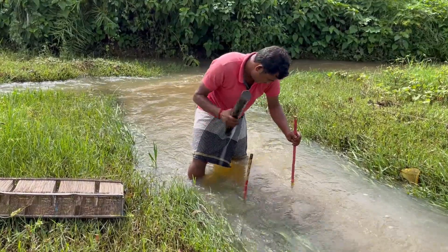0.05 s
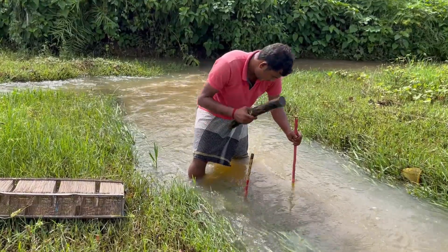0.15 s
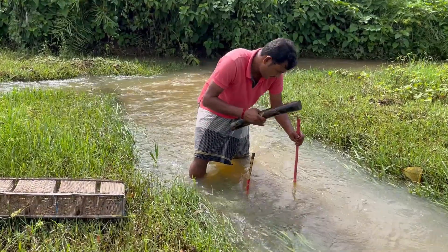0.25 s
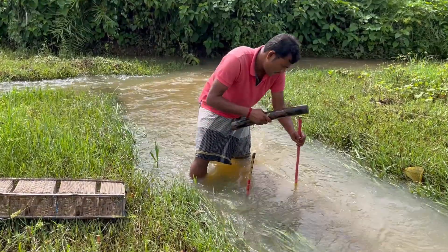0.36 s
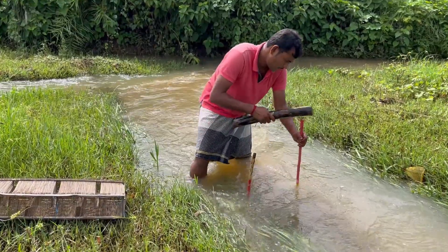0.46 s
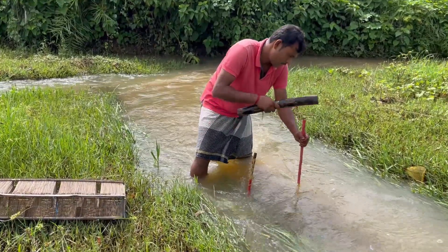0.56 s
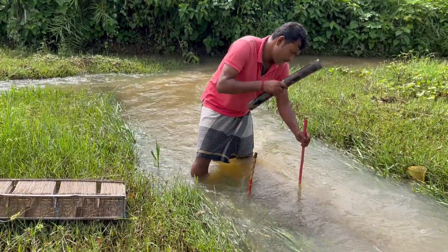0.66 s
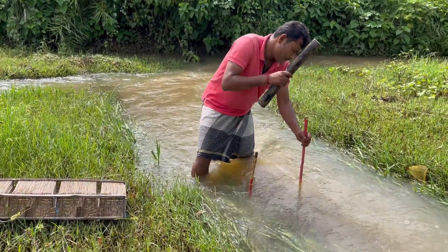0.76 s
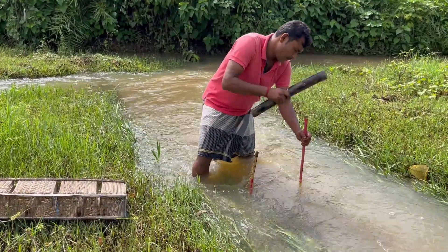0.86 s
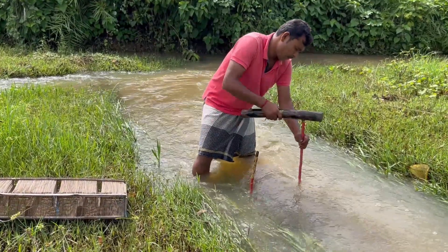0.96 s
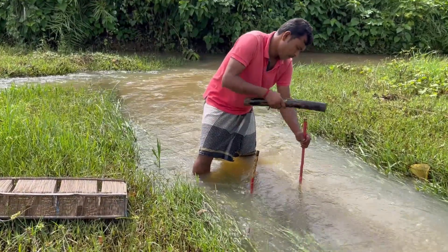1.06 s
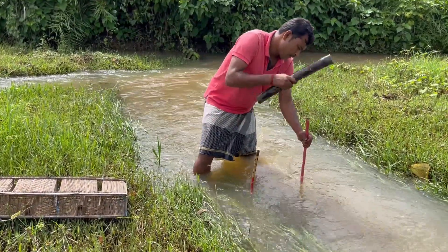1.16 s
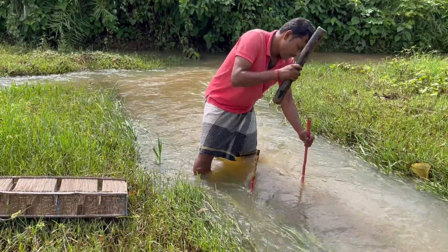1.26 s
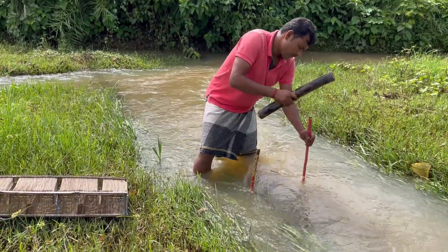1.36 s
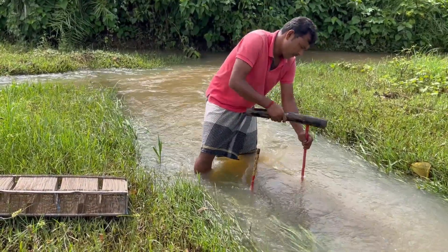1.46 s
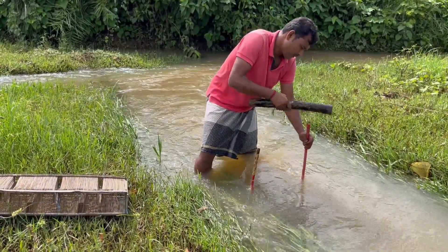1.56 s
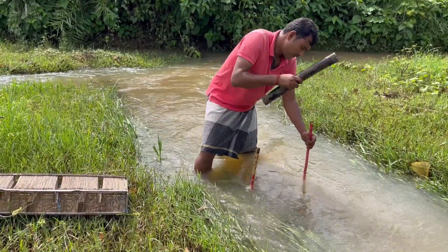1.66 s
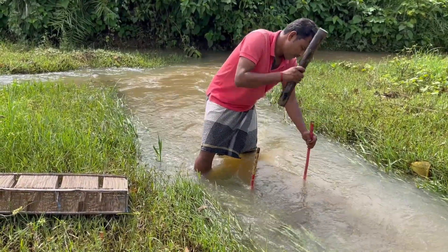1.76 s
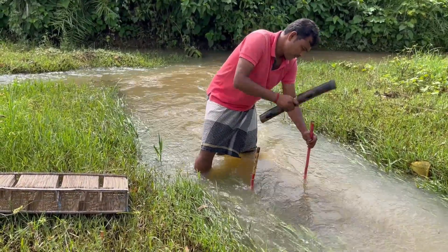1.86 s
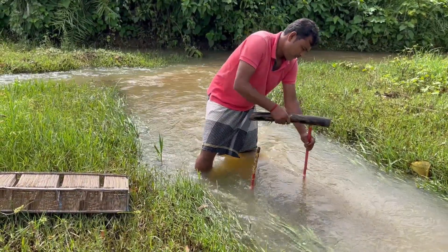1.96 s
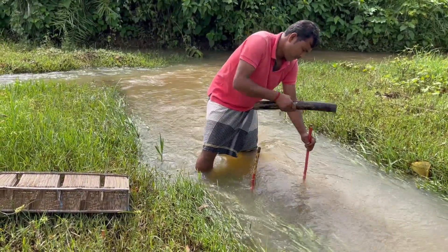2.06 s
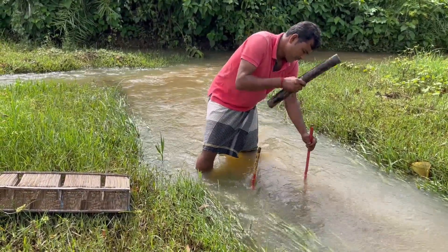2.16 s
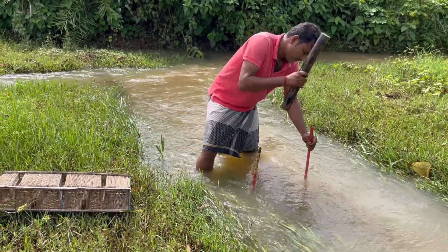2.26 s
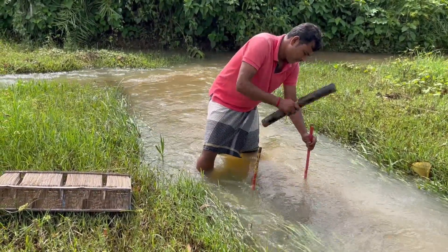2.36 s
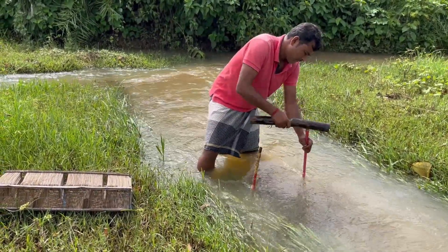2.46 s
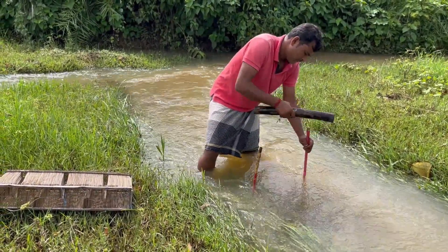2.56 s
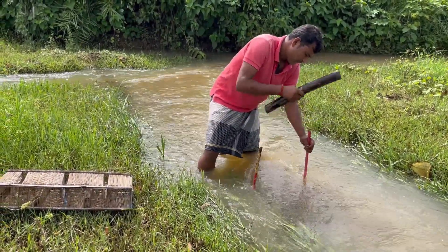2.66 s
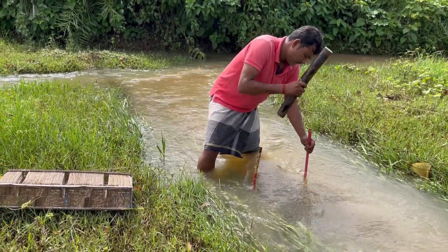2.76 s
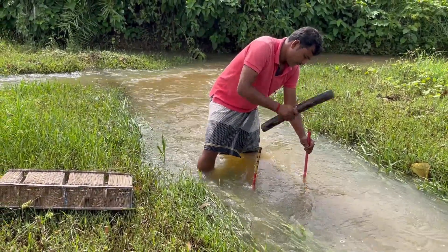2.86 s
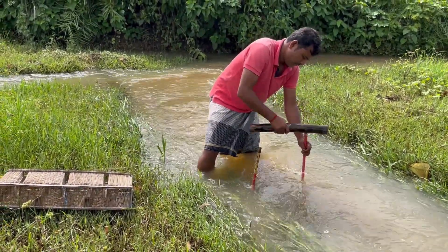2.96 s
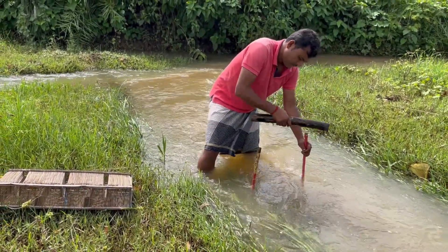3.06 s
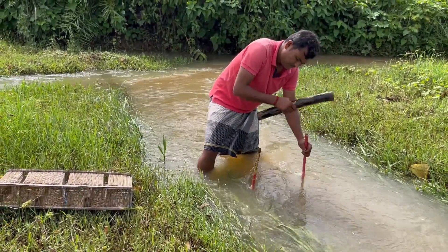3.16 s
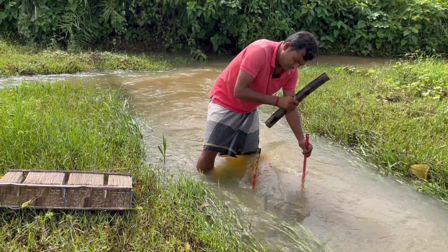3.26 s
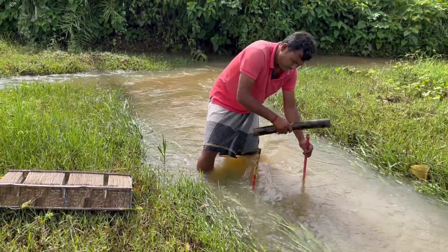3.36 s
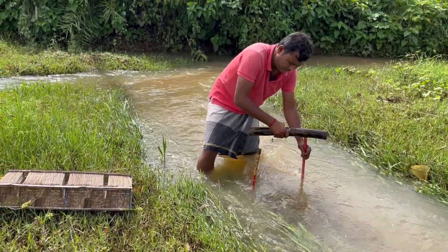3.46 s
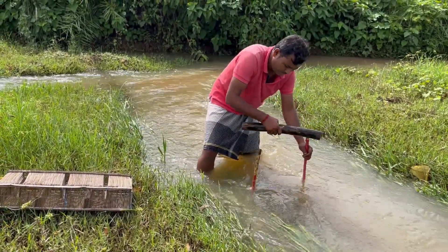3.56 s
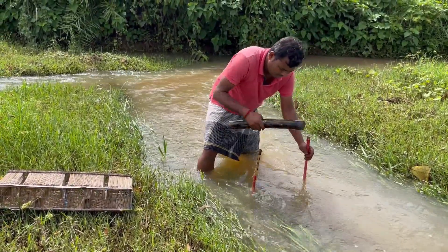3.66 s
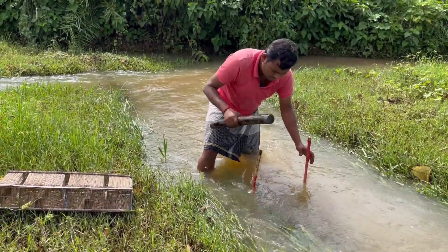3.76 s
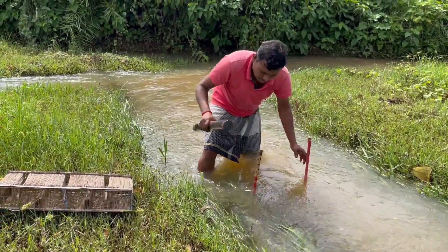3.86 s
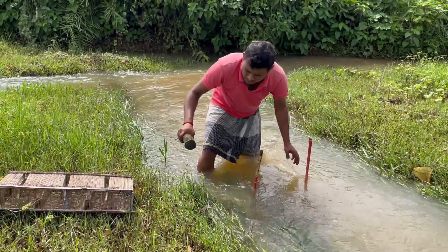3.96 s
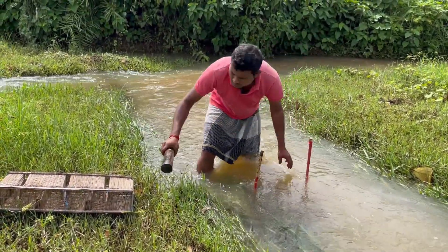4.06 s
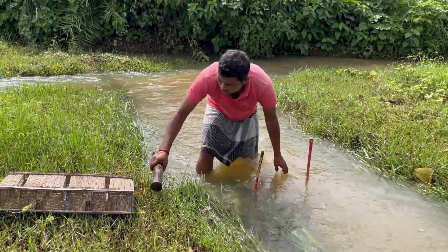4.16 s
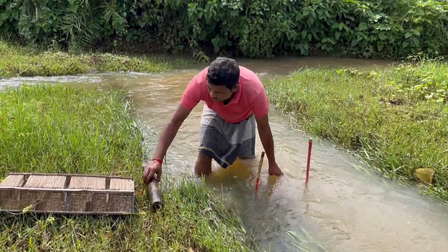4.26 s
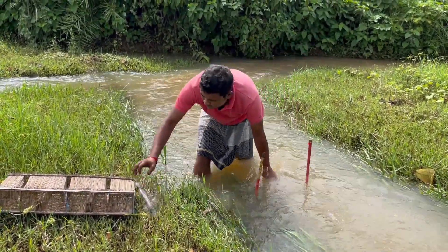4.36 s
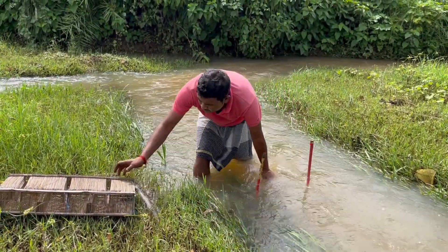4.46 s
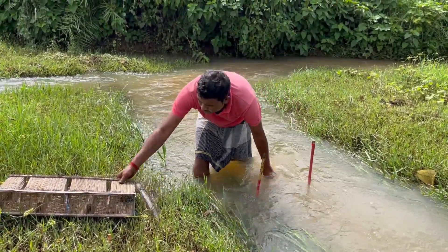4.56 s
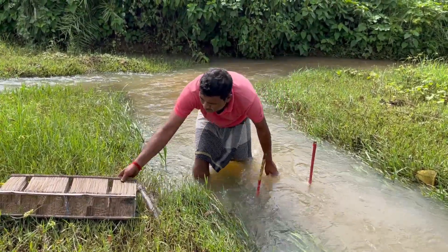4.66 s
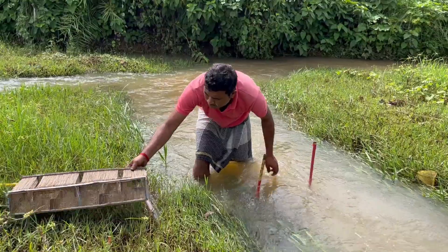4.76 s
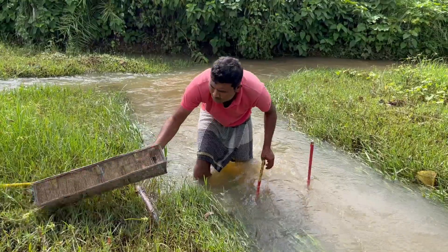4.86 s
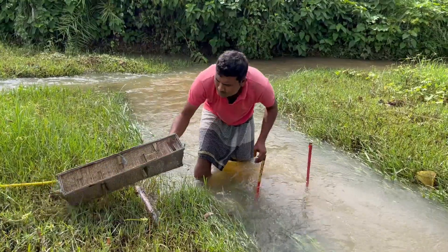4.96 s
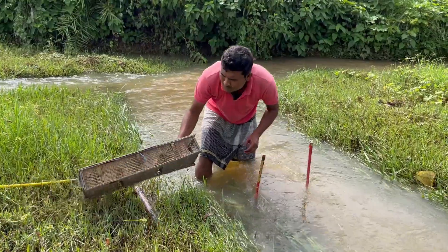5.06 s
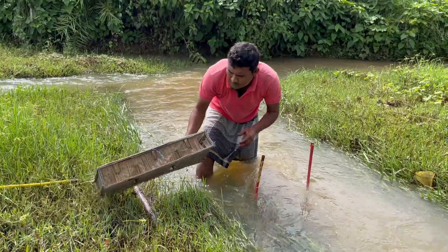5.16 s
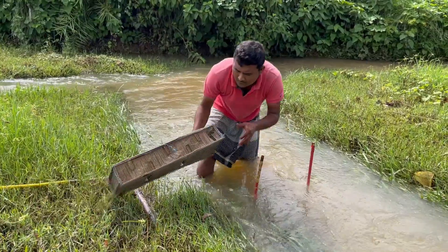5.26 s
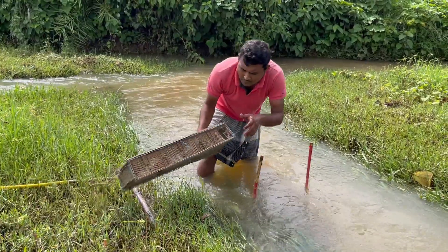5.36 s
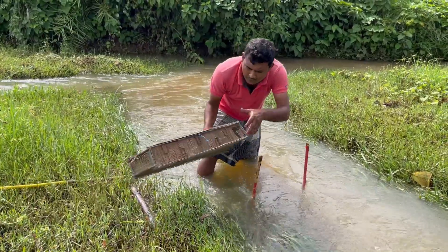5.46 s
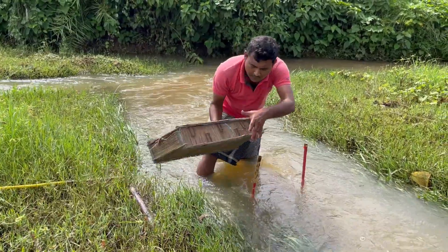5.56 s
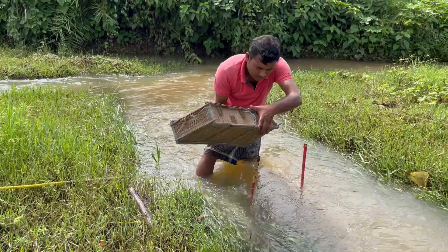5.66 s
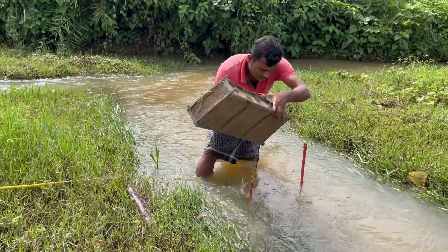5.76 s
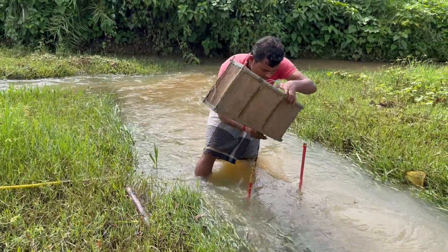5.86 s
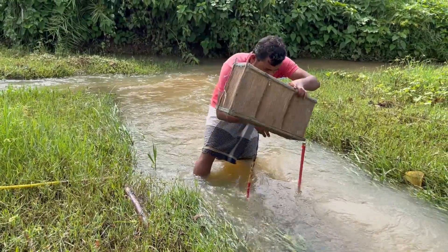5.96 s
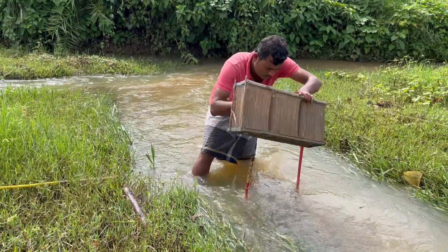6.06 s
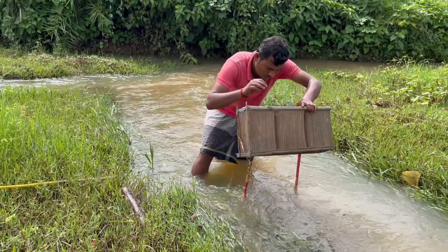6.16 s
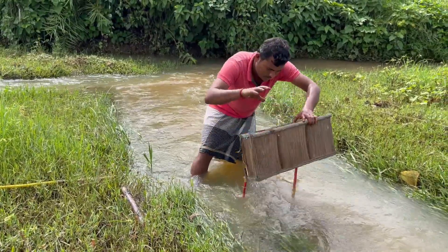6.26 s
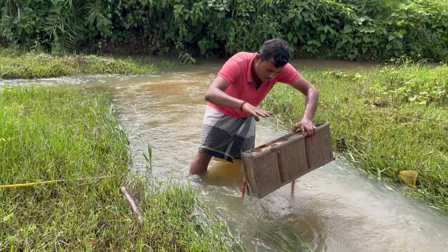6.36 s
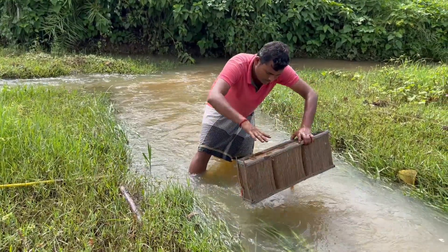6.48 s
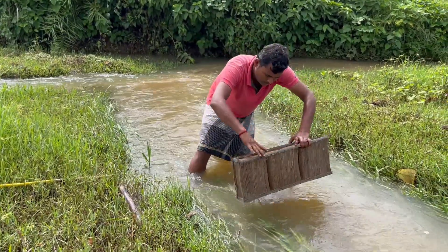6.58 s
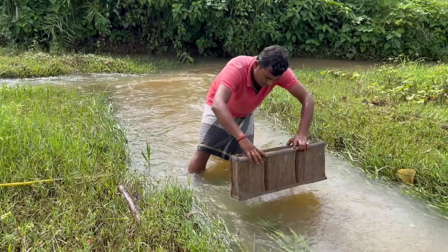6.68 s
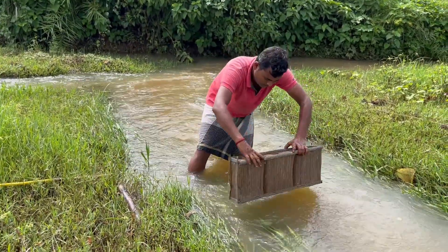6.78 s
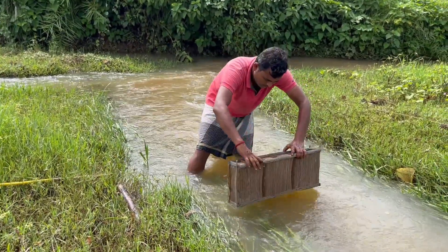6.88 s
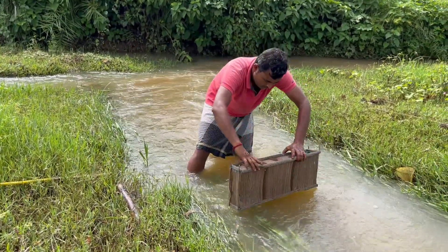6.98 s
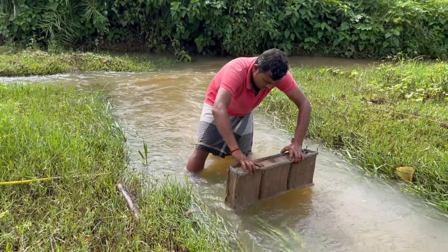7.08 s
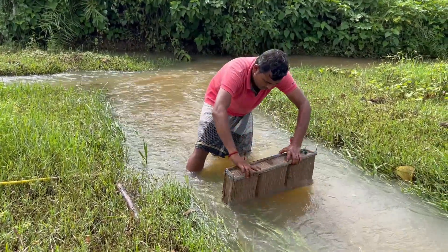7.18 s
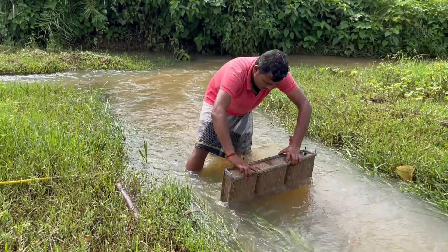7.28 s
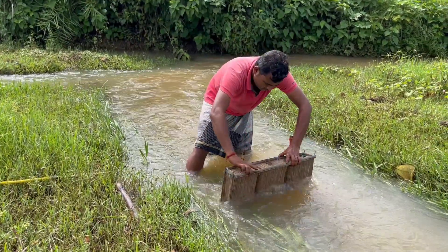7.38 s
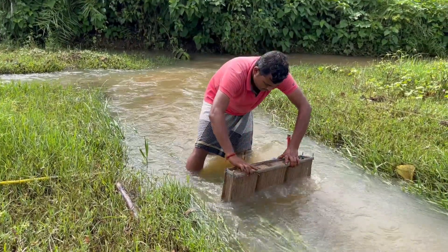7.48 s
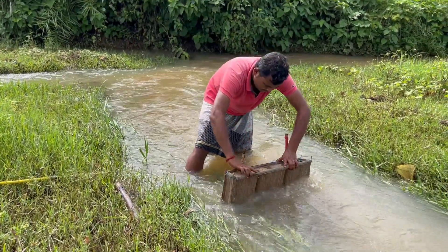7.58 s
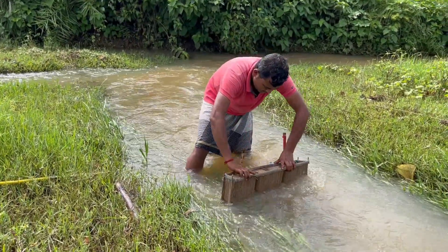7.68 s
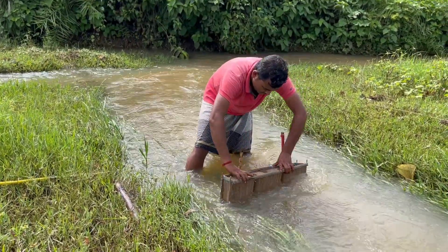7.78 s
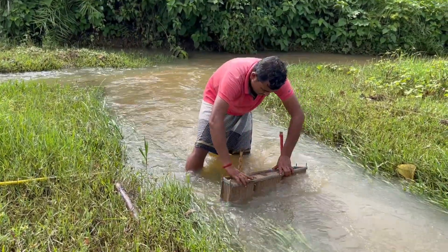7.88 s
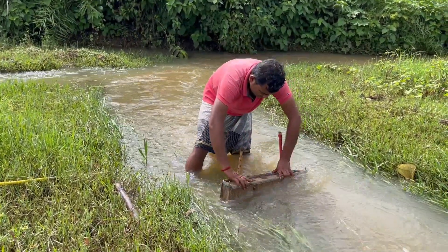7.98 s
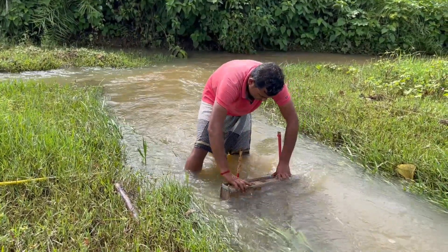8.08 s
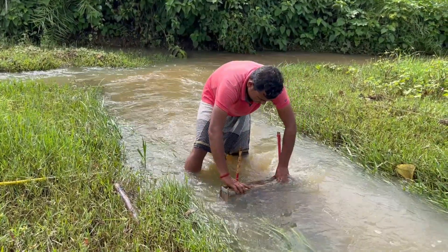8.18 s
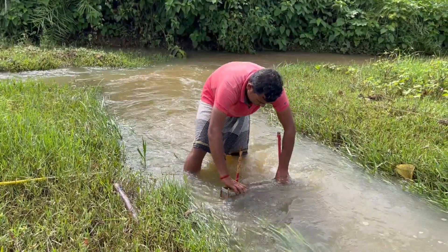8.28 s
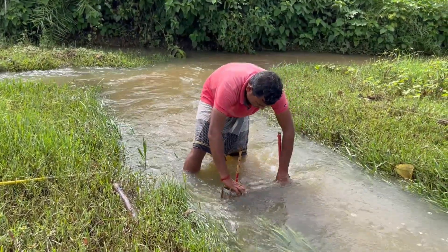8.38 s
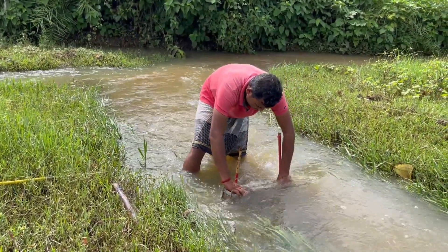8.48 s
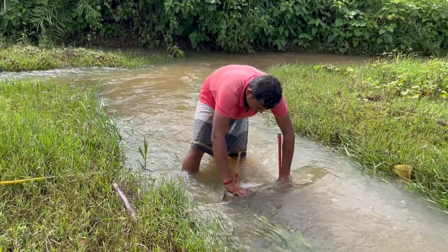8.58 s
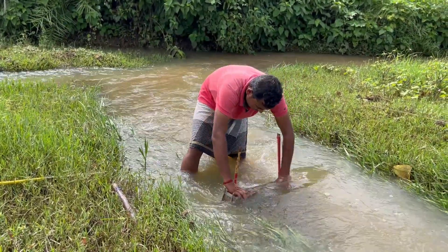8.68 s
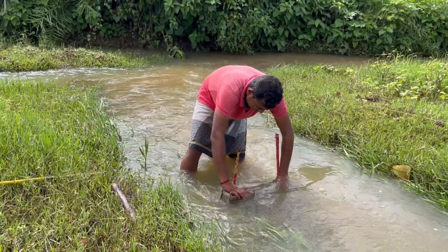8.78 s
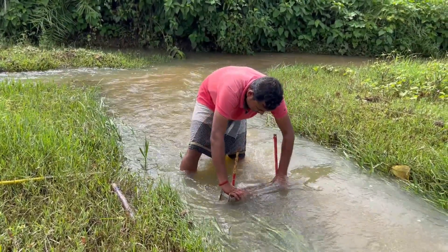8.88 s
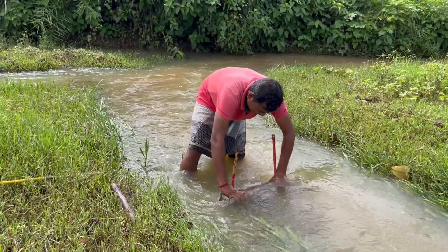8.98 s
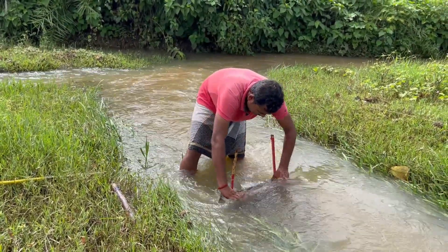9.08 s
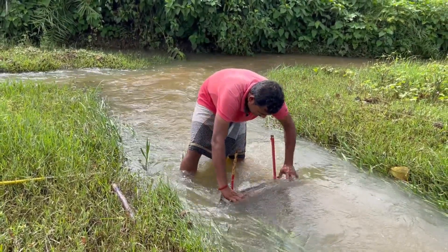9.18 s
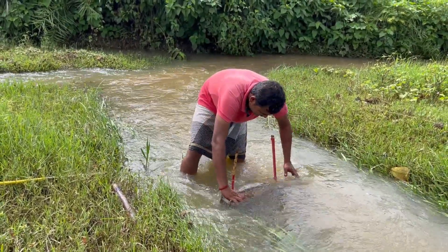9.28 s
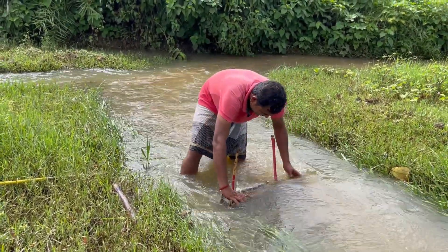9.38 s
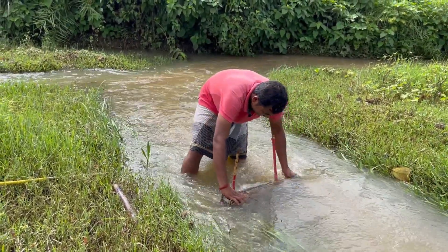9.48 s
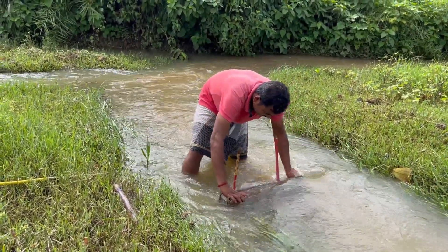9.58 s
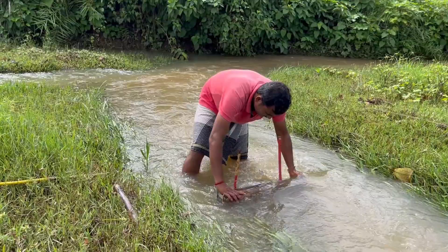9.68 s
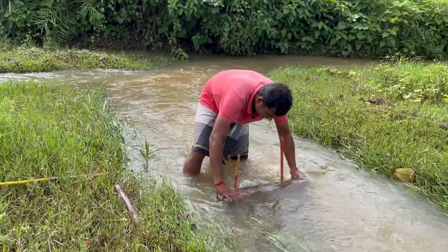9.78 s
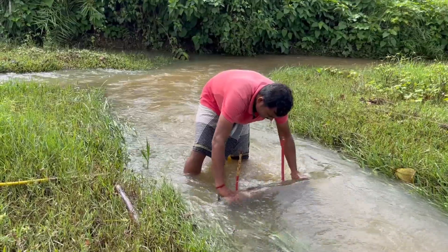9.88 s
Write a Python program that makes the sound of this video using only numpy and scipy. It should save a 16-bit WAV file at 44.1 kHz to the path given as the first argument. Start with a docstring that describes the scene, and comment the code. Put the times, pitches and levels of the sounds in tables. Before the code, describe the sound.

Six wooden knocks drive a stake in a gurgling shallow canal, a bar drops in grass, then a trap is pushed under with splashing.

```python
"""In a shallow canal with grassy banks, someone drives a wooden stake with a bar, drops the bar in the
grass, then drags a slatted trap over the grass and pushes it under the running water.
Blows and knocks are dying sine waves plus noise; water is many ringing bubbles, hiss and noise bursts.
A small bird trills in gliding sines. Wind buffets a handheld microphone as low noise and low thumps;
one more low thump is the bar landing. The two ports, left and right, colour the sound differently."""
import sys
import numpy as np
from scipy import signal
from scipy.fft import rfft, irfft, next_fast_len
from scipy.io import wavfile
from scipy.ndimage import uniform_filter1d

SR = 44100
rng = np.random.default_rng(int(sys.argv[2]) if len(sys.argv) > 2 else 0)


def to_wav(s):
    """Save 16-bit WAV."""
    ch = np.atleast_2d(s).T  # columns
    pcm = np.round(np.clip(ch, -1, 1) * 32767)  # PCM
    wavfile.write(sys.argv[1], SR, pcm.astype(np.int16))


N = 437913  # length in samples

# Wind rumble over time: (time [s], level [dB])
WIND_LEVEL = [(0.0, -54.5), (1.2, -55), (1.8, -53.5), (2.6, -56), (3.3, -54), (3.75, -58), (4.06, -55.5),
              (4.45, -57), (4.65, -49), (4.89, -45.5), (4.97, -48), (5.1, -45.5), (5.27, -43.5),
              (5.42, -62), (5.86, -53.5), (6.0, -57), (6.47, -57), (6.6, -64.5), (7.53, -64), (7.65, -53),
              (8.03, -48.5), (8.15, -58), (9.93, -57)]
# Tone of wind rumble and ground shudder: (frequency [Hz], level per Hz [dB])
RUMBLE_TONE = [(20, -25), (35, -7), (50, 0), (65, 4), (85, -1.5), (110, -3.5), (150, -8), (220, -35)]
# Low thumps: wind puffs on the ports, and at 4.371 s the thud of the bar landing:
# (time of the middle [s], peak level [dB], pitch [Hz], half length [s])
LOW_THUMPS = [(2.401, -38.5, 62, 0.041), (4.371, -38.5, 65, 0.026), (4.566, -41, 60.4, 0.035),
              (4.801, -33, 67.4, 0.043), (4.877, -25, 67, 0.041), (4.916, -34, 66, 0.027),
              (5.074, -31, 65.6, 0.026), (5.859, -37, 92.5, 0.013), (6.468, -57, 60, 0.041),
              (8.038, -26.5, 56, 0.042)]
LUMP_S, LUMP_DB = 0.13, 3  # length and strength of the lumps in the wind

# Notes of the bird: (start time [s], level [dB])
TRILL = [(5.305, -59), (5.395, -52), (5.488, -56), (5.583, -55), (5.68, -57), (5.778, -60), (5.88, -67)]
# Course of one note: (time after its start [s], pitch [Hz], level [dB])
NOTE = [(0, 7200, -22), (.006, 7000, -6), (.016, 6600, -9), (.03, 5300, -12), (0.037, 5050, 5),
        (.052, 5000, -6), (0.061, 5050, -10), (.085, 5000, -14)]

# Running and stirred water, 6 dB is added later: (time [s], gurgle level [dB], splash level [dB])
WATER_LEVEL = [(0.0, -56, -59), (1.38, -55.5, -61.5), (3.15, -54.5, -58.5), (3.6, -56, -61),
               (3.98, -53, -56.5), (4.4, -55, -54.5), (4.92, -57, -59), (5.55, -59, -62), (6.0, -57.5, -58),
               (6.41, -56.5, -61), (7.05, -61, -58.5), (7.3, -53, -54), (7.39, -49.5, -50.5),
               (7.5, -55, -53), (7.77, -55.5, -49.5), (8.16, -54.5, -53.5), (8.35, -51, -54),
               (8.63, -55, -52.5), (8.85, -57.5, -56.5), (9.2, -53.5, -51.5), (9.79, -52, -50),
               (9.93, -52, -51)]
# Tone of the low, middle and high water sounds: (frequency [Hz], level per Hz [dB])
GURGLE_TONE = [(70, -2), (120, -3.5), (250, -5), (450, -6.5), (700, -2.5), (1000, -11.5), (1400, -13.5),
               (2000, -13)]
SPLASH_TONE = [(800, -0.5), (1400, -2.5), (1900, -4.5), (2600, -6.5), (3600, -7.5), (5000, -10.5),
               (7000, -12), (9500, -23.5)]
SPRAY_TONE = [(4000, -42), (6000, -21), (7500, -12.5), (9500, -1), (12500, -6.5), (14500, -5), (16000, -45)]
# How alike the water is left and right: (frequency [Hz], likeness [0-1])
LIKENESS = [(100, 0.88), (250, 0.86), (470, 0.35), (900, 0.44), (1250, 0.27), (1600, 1), (2250, 0.074),
            (2800, 0.64), (5400, 0.53), (7300, 0.51), (8300, 1), (9600, 1), (12000, 1), (13800, 0.86)]
# Spray level on calm water (6 dB is added later), dB gained per dB of splash above calm, calm splash level
SPRAY_DB, SPRAY_FOLLOW, CALM_DB = -68.5, 0.78, -60.5
# The trap is pulled over the grass and the treble hiss swells: middle, width and height
DRAG_S, DRAG_WIDTH_S, DRAG_DB = 4.9, .2, 8.5

# Bubbles and drips at set times, 0.5 dB is taken off later: (time [s], level [dB], pitch [Hz], length [s])
BUBBLES = [(0.421, -27.5, 540, 0.0035), (1, -43.5, 4100, 0.0035), (1.59, -41, 4220, .0072),
           (2.024, -40.5, 646, 0.033), (2.699, -33, 687, 0.0093), (3.042, -35, 3630, 0.004),
           (3.647, -37.5, 834, 0.0065), (3.984, -41, 1340, 0.0058), (3.934, -42, 780, 0.0099),
           (4.074, -42, 730, .0097), (4.184, -40.5, 4000, 0.0046), (4.228, -39.5, 1720, 0.021),
           (4.26, -39.5, 786, 0.011), (4.537, -39, 1340, 0.0085), (4.567, -42, 4090, 0.0047),
           (4.837, -46, 1190, 0.014), (5.803, -39, 1530, 0.0052), (5.846, -35, 3110, 0.0025),
           (5.945, -38.5, 647, .0052), (6.087, -36, 2040, 0.0072), (6.185, -43, 554, 0.017),
           (6.862, -43, 1190, 0.015), (6.864, -41, 1430, .007), (6.881, -42, 1400, 0.0097),
           (7.156, -39, 1023, 0.021), (7.208, -38, 1830, 0.0073), (7.411, -36, 1370, 0.0065),
           (7.359, -39, 1000, .01), (7.81, -43, 5240, 0.013), (8.235, -39, 5820, .0057),
           (8.342, -38.5, 1510, 0.0039), (8.387, -36, 786, 0.0049), (8.409, -36, 219, 0.013),
           (8.455, -32, 930, 0.0034), (8.687, -38, 2770, .006), (8.707, -36, 2100, 0.0061),
           (8.725, -36.5, 1710, 0.012), (8.793, -40, 1030, .0079), (8.858, -41, 1500, 0.0048),
           (9.136, -36.5, 1340, 0.0082), (9.151, -35, 4950, .0067), (9.19, -38, 1200, .0098),
           (9.254, -41, 315, 0.018), (9.269, -41, 5730, .0061), (9.499, -41, 623, 0.018),
           (9.609, -34.5, 2360, 0.0045), (9.626, -40, 533, .028), (9.652, -37.5, 3320, .006),
           (9.407, -38.5, 746, .012), (9.736, -37, 1120, .0045), (9.752, -34, 2230, 0.004),
           (9.791, -38, 2950, 0.0064), (9.881, -39, 1980, 0.0085), (2.012, -45, 1860, 0.0084),
           (8.253, -44, 614, 0.016), (7.294, -42, 1320, 0.013), (7.639, -41, 1840, 0.012),
           (7.84, -49, 1840, 0.017), (8.545, -49, 444, .02), (9.443, -43, 2380, .01),
           (9.61, -34.5, 1800, 0.0084)]
# Large pockets of air that gulp or hum, 0.5 dB is taken off later:
# (time [s], level [dB], pitch [Hz], length [s], pitch rise [octaves/s])
GLUGS = [(1.996, -46.5, 874, 0.067, 1), (4.028, -46.5, 225, 0.044, 6.5), (4.11, -47.5, 310, 0.042, 2),
         (4.223, -41, 630, 0.032, 5), (6.88, -51, 288, .06, -4), (6.99, -51.5, 269, 0.061, 0),
         (7.266, -48.5, 299, 0.044, 5), (7.421, -44, 607, 0.035, 0), (8.341, -44.5, 292, 0.042, -3),
         (8.431, -46.5, 270, .03, 1), (9.6, -46.5, 284.7, 0.06, 2), (9.675, -43.5, 267.5, 0.04, -2.5),
         (9.768, -45, 270, 0.031, 0.1), (9.898, -36, 480, .03, 46.5)]
RISE_OCT_PER_S = 9.7  # long bubbles climb further
BUBBLE_HOLD, GLUG_HOLD = 0.33, 0.77  # share of the length before the decay starts
# Chance drips: level above the splash, length scale at 1 kHz, level per octave (small ones are fainter)
DRIPS_PER_S, DRIP_DB, DRIP_SPREAD_DB, DRIP_S, DRIP_TILT_DB = 38, 3, 1.4, 0.0108, -2

# Slaps of water at set times, 4 dB is taken off later: (time [s], level [dB], treble level [dB])
SLAPS = [(1.5922, -37, -23), (3.042, -40, -23), (3.2011, -38, -16), (3.506, -41, -9), (3.9363, -38, -18),
         (4.183, -40, -19), (4.2278, -38, 1), (4.4266, -36.5, -12), (4.5156, -39, 5), (4.5366, -40, -10),
         (5.7987, -39, -20), (5.985, -43, -1), (6.5031, -40, -4.5), (7.2477, -36, -19), (7.5187, -38.5, -4),
         (7.7398, -35, -17), (8.0165, -35, 6), (8.2356, -30.5, -6), (8.4247, -38, -10), (8.5132, -34, -9),
         (8.531, -33, -5), (8.6503, -33.5, -4), (9.15, -37, -6), (9.186, -35.5, -8), (9.269, -34.5, 2),
         (9.3257, -35, -7), (9.421, -34.5, -13), (9.6091, -40, -4), (9.652, -38, -3), (9.789, -34, -16),
         (9.8186, -34, -11), (9.862, -34, 5), (9.9022, -30.5, -9.5)]
# Time to fall by 60 dB; then the chance slaps: level above the splash, middle of their treble levels
SLAP_T60_S, SLAPS_PER_S, SLAP_DB, SLAP_TREBLE_DB = 0.031, 4.4, 10.5, -2

# Tone of crushed and snapping grass: (frequency [Hz], level per Hz [dB])
GRASS_TONE = [(120, -13), (250, -17), (450, 0), (700, 5.5), (1000, -2), (1400, -3.5), (1900, 0.5),
              (2600, -0.5), (3600, -3.5), (5000, -2), (7000, 0), (9500, 0), (12500, -7.5), (15500, -6)]
# Grass blades snap under the moving trap: level, width of the swell
SNAP_DB, SNAP_WIDTH_S, SNAPS_PER_S = -59.5, 0.37, 250
# Grass blades crushed by the falling bar: (time [s], level [dB])
CRUSHED_GRASS = [(4.335, -54), (4.359, -26.5), (4.363, -27), (4.399, -48.5), (4.41, -33)]
# Knocks of the fallen bar on the soil: (time [s], level [dB])
SOIL_KNOCKS = [(4.353, -26.5), (4.357, -37), (4.365, -21.5), (4.377, -35)]

# Blows on the stake: (time [s], contact time [s], stake pitch [factor], bar level [dB], stake level [dB],
# overtone lift [dB], crack level [dB], crack treble [dB], thud level [dB])
BLOWS = [(0.927, 0.0035, 0.86, -6, -23.5, 5.5, -21, -14, -36.5),
         (1.417, 0.0032, 0.91, -12, -16, -4, -21.5, -7.5, -34),
         (1.9126, 0.0023, 1.09, -5.5, -14.5, -3.5, -21, -8, -32),
         (2.415, 0.0029, 1.12, -10.5, -14.5, -1, -22.5, 0, -37),
         (2.9178, 0.0025, 1.026, -15.5, -12.5, 3.5, -23.5, -6, -30),
         (3.3959, 0.0027, 1.11, -15, -16, -3, -26.5, -7, -31)]
# Ringing modes of bar and stake: (frequency [Hz], time to the peak [share of contact time],
# how far it follows the stake pitch [0-1], level [dB], share of the bar rather than the stake [0-1])
WOOD_MODES = [(371.6, 0.37, 0.42, -3.5, 0.57), (732, 0.58, 0.81, 1.4, 0), (1120, 0.18, 0, -5, 0.7),
              (1512, 0.66, 0.054, -0.1, 1), (2024, 0.13, 0.23, -17.5, 1), (2734, 0.47, 0.23, -8.5, 0.2),
              (3440, 0.62, 0.12, -20, 0.53), (4900, 1, 0, -35, 1), (6700, 0.33, 0, -23, 0.9)]
# Scatter off grass and water, with the main ring of the bar: (frequency [Hz], level per Hz [dB])
SCATTER_TONE = [(250, 9), (700, 3), (1330, -3), (1540, 16), (1780, -10), (3000, -5), (6000, -21),
                (12000, -24)]
# Echoes off the banks: (delay [s], level [dB])
ECHOES = [(.016, -30), (0.029, -56), (.04, -29), (.052, -52.5)]
OVERTONE_HZ, SHARP_SHARE = 2400, 0.047  # modes above it get the lift; all start sharp by this share
THUD_HZ, THUD_DROP_HZ, THUD_DROP_S = 62.4, 55, 0.028  # the thud sinks to its pitch
SHAKE_BELOW_THUD_DB, SHAKE_T60_S = 12, 0.31  # rumble through the bank

# Phase lead of the left port over the right: (frequency [Hz], lead [radians])
LEFT_LEAD = [(0, 0), (550, .4), (800, 0), (950, .5), (1250, -.9), (1600, 3.1), (1760, 6.3), (3000, 6.9),
             (4900, 6.8), (5400, 5.4), (8300, 3.14), (12000, 0), (15000, -3.1), (22050, -9)]
# Extra loudness of the left port: (frequency [Hz], level [dB])
LEFT_LOUDER = [(50, 1.1), (130, 1.4), (430, 2), (620, 2), (850, 6), (1080, 4), (1350, 2.5), (1580, -5),
               (1720, 4), (2600, -1), (3000, 1.5), (3800, -1.5), (5000, 4), (7500, 1), (8300, -0.5)]
EDGE_HZ = 16200  # upper limit of the microphone sound


def amp(db):
    """Gain of a level in dB."""
    return 10 ** (np.asarray(db) / 20)


def evened(x):
    """Scales to rms 1, an average strength of one."""
    return x / np.sqrt(np.mean(np.abs(x) ** 2) + 1e-20)


def read(points, hz):
    """Reads a spectrum table on a log-frequency axis."""
    f, value = np.transpose(points)
    return np.interp(np.log(hz + 1), np.log(f + 1), value)


def add(mix, s, sound):
    """Mixes a sound in at s seconds."""
    part = mix[round(s * SR):][:len(sound)]
    part += sound[:len(part)]


def coloured(x, points):
    """Filters x by a spectrum table, silent outside it, rms 1."""
    hz = np.fft.rfftfreq(x.shape[-1], 1 / SR)
    inside = (hz > points[0][0]) & (hz < points[-1][0])
    return evened(irfft(rfft(x) * amp(read(points, hz)) * inside, x.shape[-1]))


def chance(per_s, above_db, spread_db):
    """Random moments, levels riding on the splash, and two spare draws."""
    when, keep, size, a, b = rng.random((400, 5)).T
    s, _, splash_db = np.transpose(WATER_LEVEL)
    when = when * N / SR
    db = np.interp(when, s, splash_db) + above_db - spread_db * np.log(size + 0.025)
    return np.transpose([when, db, a, b])[keep < per_s * N / SR / len(keep)]


def wind():
    """Wind pushing on the ports: lumpy low rumble, nearly alike on both."""
    a, b, c = rng.standard_normal((3, next_fast_len(N)))
    lumps = evened(signal.oaconvolve(c, np.hanning(round(LUMP_S * SR)), "same")[:N])
    s, db = np.transpose(WIND_LEVEL)
    level_db = np.interp(np.arange(N) / SR, s, db) + LUMP_DB * lumps
    same = .92
    pair = np.array([a, same * a + np.sqrt(1 - same ** 2) * b])
    return coloured(pair, RUMBLE_TONE)[:, :N] * amp(level_db)


def low_thumps():
    """Wind puffs on the ports and the thud of the bar landing: low waves that swell and fade."""
    out = np.zeros(N)
    for s, db, hz, half_length in LOW_THUMPS:
        t = np.arange(-half_length, half_length, 1 / SR)
        swell = np.exp(-(3 * t / half_length) ** 2)
        add(out, s - half_length, amp(db) * swell * np.cos(2 * np.pi * hz * t))
    return out


def bird():
    """Falling whistles that settle on a held pitch; they reach the right port a little later."""
    out = np.zeros((2, N))
    s, hz, db = np.transpose(NOTE)
    t = np.arange(0, s[-1], 1 / SR)
    for (start, level_db), bend in zip(TRILL, rng.uniform(0.95, 1.01, len(TRILL))):
        # leaves and air blur the tone
        flutter_db = 4 * evened(uniform_filter1d(rng.standard_normal(len(t)), size=120))
        turns = np.cumsum(bend * np.interp(t, s, hz)) / SR
        note = amp(level_db + flutter_db + np.interp(t, s, db)) * np.sin(2 * np.pi * turns)
        add(out[0], start, note)
        add(out[1], start, np.append(np.zeros(3), note))  # three samples late
    return out


def bubble(hz, t60, rise):
    """A trapped pocket of air rings and climbs in pitch as it nears the surface."""
    t = np.arange(round(max(t60, .002) * SR)) / SR
    turns = np.cumsum(hz * 2 ** (rise * t / t60)) / SR
    return amp(-60 * t / t60) * np.minimum(turns / 0.85, 1) * np.sin(2 * np.pi * turns)


def froth(per_s, cycles, spread_db):
    """Bubbles of all sizes at random moments, more of the small ones, a few of them loud."""
    out = np.zeros(N)
    for hz in np.geomspace(170, 11000, 26):
        draws = rng.random((round(N / SR * 200), 3))
        kept = draws[:, 2] < per_s * (hz / 1000) ** .3 / 200
        size = amp(spread_db * np.minimum(-np.log(draws[:, 1]), 5)) * kept
        train = evened(np.bincount((draws[:, 0] * N).astype(int), size, N))
        shape = bubble(hz, cycles / hz * (hz / 1000) ** .3, rng.uniform(.15, .6))
        out += signal.oaconvolve(train, shape * np.sqrt(hz) / np.linalg.norm(shape))[:N]
    return out


def water():
    """Froth over a far wash, in three ranges that follow the stirring, with patches and shared flicker."""
    pair = [froth(per_s=60, cycles=36, spread_db=2.7) for _ in range(2)]
    hz, t, z = signal.stft(np.array(pair), SR, nperseg=512, noverlap=384)
    # level out the spectrum before shaping it
    z = z / np.sqrt(uniform_filter1d((np.abs(z) ** 2).mean(axis=(0, 2)), size=5))[:, None]
    a, b, patches = rng.standard_normal((len(t), 2, len(hz), 3)).T.swapaxes(1, 2)
    # power share of far water, which blurs into hiss
    wash = read([(300, .55), (2000, .6), (5000, .65), (9000, .9)], hz)[:, None]
    z = np.sqrt(1 - wash) * z + np.sqrt(wash / 2) * (a + 1j * b)
    same = np.clip(read(LIKENESS, hz), 0, 1)[:, None]
    z = np.array([z[0], same * z[0] + np.sqrt(1 - same ** 2) * z[1]])

    s, gurgle_db, splash_db = np.transpose(WATER_LEVEL)
    gurgle_db, splash_db = np.interp(t, s, gurgle_db), np.interp(t, s, splash_db)
    drag_db = DRAG_DB * np.exp(-((t - DRAG_S) / DRAG_WIDTH_S) ** 2)
    spray_db = SPRAY_DB + SPRAY_FOLLOW * (splash_db - CALM_DB) + drag_db
    power = 0
    for points, level_db in zip((GURGLE_TONE, SPLASH_TONE, SPRAY_TONE), (gurgle_db, splash_db, spray_db)):
        inside = (hz > points[0][0]) & (hz < points[-1][0])
        shape = evened(amp(read(points, hz)) * inside)
        power = power + (shape[:, None] * amp(level_db + 6.0)) ** 2

    blotch = evened(uniform_filter1d(uniform_filter1d(patches[0], size=14, axis=1), size=6, axis=0))
    # slaps light up all the treble
    flicker = evened(uniform_filter1d(rng.exponential(1, len(t)) - 1, size=3))
    flicker_db = read([(500, .3), (3000, .8), (10000, .6)], hz)[:, None] * flicker
    z *= np.sqrt(power) * amp(1.5 * blotch + flicker_db)
    unit = np.sqrt(3 / 1024)  # turns spectrum strength into sound strength
    return signal.istft(z * unit, SR, nperseg=512, noverlap=384)[1][:, :N]


def bubbles():
    """Single pockets of air ring: a soft swell, a slight waver, a quick death."""
    out = np.zeros(N)
    drips = []
    for s, db, a, b in chance(DRIPS_PER_S, DRIP_DB, DRIP_SPREAD_DB):
        hz = 350 * 14 ** a
        length = DRIP_S * (.5 + b) / (hz / 1000) ** 0.31
        drips.append((s, db + DRIP_TILT_DB * (a - .5) * np.log2(14), hz, length))
    rows = [(*row, GLUG_HOLD) for row in GLUGS]
    rows += [(*row, RISE_OCT_PER_S, BUBBLE_HOLD) for row in BUBBLES + drips]
    for (s, db, hz, length, rise, hold), grit in zip(rows, rng.standard_normal((500, 40))):
        u = np.arange(round(4 * length * SR)) / (length * SR)  # time in bubble lengths
        waver = np.interp(u, np.linspace(0, 4, 40), grit)
        pitch = hz * 2 ** (rise * length * np.minimum(u, 1.3)) * (1 + 0.023 * waver)
        turns = np.cumsum(pitch) / SR
        decay_db = np.maximum(u - hold, 0) * (15 + 1.2 * np.log2(hz / 250))  # small ones die sooner
        swell = np.sin(np.pi / 2 * np.minimum(u / 0.3, 1)) ** 2 * amp(3.3 * waver - decay_db)
        add(out, max(s - .001, 0), amp(db - 0.5) * swell * np.sin(2 * np.pi * turns))
    return out


def slaps():
    """Short bursts of noise where a sheet of water breaks."""
    out, t = np.zeros(N), np.arange(1500) / SR
    small = [(s, db, SLAP_TREBLE_DB + 14 * (a - .5))
             for s, db, a, _ in chance(SLAPS_PER_S, SLAP_DB, spread_db=2.0)]
    for (s, db, treble_db), grit in zip(SLAPS + small, rng.standard_normal((200, 1500))):
        tone = [(500, -9), (2500, -3.5), (6000, -4.5), (10000, treble_db), (16000, treble_db - 14)]
        fade = amp(db - 4 - 60 * t / SLAP_T60_S) * np.minimum(t / 0.0016, 1)
        add(out, s, fade * coloured(grit, tone))
    return out


def drag():
    """Blades of grass snap sparsely, as tiny noise bursts, while the trap is pulled and lifted."""
    snapping = rng.random(N) < SNAPS_PER_S / SR
    size = amp(4.2 * np.minimum(rng.exponential(1, N), 4)) * rng.standard_normal(N) * snapping
    one_snap = rng.standard_normal(150) * amp(-.25 * np.arange(150))
    snaps = signal.oaconvolve(size, one_snap)[:N]
    swell = np.exp(-((np.arange(N) / SR - DRAG_S) / SNAP_WIDTH_S) ** 2)
    return amp(SNAP_DB) * swell * coloured(snaps, GRASS_TONE[3:])  # without the lowest tones


def ring(modes, count):
    """Dying sines of a struck object; modes are (frequency [Hz], level [dB], time to fall 60 dB [s])."""
    t = np.arange(count) / SR
    return sum(amp(db - 60 * t / t60) * np.sin(2 * np.pi * hz * t) for hz, db, t60 in modes)


def landing():
    """The bar crushes grass blades, which snap in a dense crackle, and knocks on the soil."""
    out = np.zeros(N)
    s, db = np.transpose(CRUSHED_GRASS)
    t = np.arange(s[0], s[-1], 1 / SR)
    snaps = rng.standard_normal(len(t)) * amp(3.7 * rng.exponential(1, len(t)))
    swell = amp(np.interp(t, s, db)) * signal.windows.tukey(len(t), .3)
    add(out, s[0], coloured(snaps, GRASS_TONE) * swell)
    knock = ring([(640, -25, 0.024), (2880, -3.0, 0.016), (3900, -19, .012), (7360, 5, 0.0089)], count=1200)
    for s, db in SOIL_KNOCKS:
        add(out, s, amp(db) * knock)
    return out


def blows():
    """Each mode swells during contact and dies in the gripping hand; crack, mud thud and echoes follow."""
    out, t = np.zeros(4 * SR), np.arange(6000) / SR
    for s, contact, factor, bar_db, stake_db, lift_db, crack_db, treble_db, thud_db in BLOWS:
        grit, start = rng.standard_normal((4, len(t))), rng.random(len(WOOD_MODES))
        for (hz, slow, shifts, db, bar), turn in zip(WOOD_MODES, start):
            u = t / (contact * slow)
            rough = 1 + .12 * np.interp(t * hz / 3 + 20 * turn, np.arange(len(t)), grit[0])
            bent_time = t + SHARP_SHARE * contact * (1 - np.exp(-t / contact))
            wave = np.sin(2 * np.pi * (hz * factor ** shifts * bent_time + turn))
            linger = np.minimum(u, 1) * amp(-25.5 - 60 * t / 0.071)  # the free end rings on faintly
            level_db = db + bar * bar_db + (1 - bar) * stake_db + lift_db * (hz > OVERTONE_HZ)
            add(out, s, amp(level_db) * (u * np.exp(1 - u) + linger) * rough * wave)

        crack = coloured(grit[1], [(1700, 3), (3000, -6.5), (8000, treble_db), (16500, treble_db - 7.0)])
        add(out, s, amp(crack_db - 60 * t / 0.042) * np.minimum(t / 0.00068, 1) * crack)
        tail = np.minimum(t / 0.014, 1) * amp(-60 * t / 0.28) * coloured(grit[2], SCATTER_TONE)
        add(out, s, amp(crack_db - 20.0) * tail)

        thud_turns = np.cumsum(THUD_HZ + THUD_DROP_HZ * np.exp(-t / THUD_DROP_S)) / SR
        thud = np.minimum(t / 0.014, 1) * amp(-60 * t / 0.15) * np.sin(2 * np.pi * thud_turns)
        add(out, s + 0.0073, amp(thud_db) * thud)
        shudder = np.minimum(t / 0.02, 1) * amp(-60 * t / SHAKE_T60_S) * coloured(grit[3], RUMBLE_TONE)
        add(out, s + 0.012, amp(thud_db - SHAKE_BELOW_THUD_DB) * shudder)

    banks = np.zeros(3000)
    for s, db in ECHOES:  # grassy banks smear each echo over a few ms
        smear = evened(rng.standard_normal(600) * np.hanning(600)) / np.sqrt(600)
        add(banks, s, amp(db) * smear)
    heard = np.zeros(N)
    add(heard, 0, out + signal.oaconvolve(out, banks)[:len(out)])
    return heard


def scene():
    """All sources added up, before the ports colour them."""
    background = wind() + low_thumps() + bird()
    return background + water() + bubbles() + slaps() + drag() + landing() + blows()


def record(dry):
    """The right port has its own phase and gain; then both lose everything above the upper limit."""
    size = next_fast_len(N + 4096)
    hz = np.fft.rfftfreq(size, 1 / SR)
    right_port = amp(-read(LEFT_LOUDER, hz)) * np.exp(-1j * np.interp(hz, *np.transpose(LEFT_LEAD)))
    right = irfft(rfft(dry[1], size) * right_port, size)[:N]
    low_pass = signal.firwin(511, EDGE_HZ, window=("kaiser", 9), fs=SR)
    return signal.oaconvolve(np.array([dry[0], right]), low_pass[None], "same")


dry = scene()
out = record(dry)
to_wav(out)
```